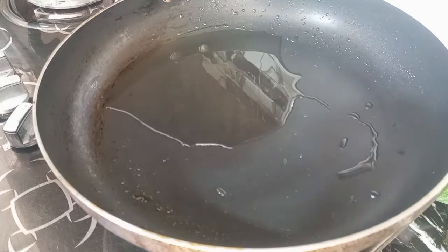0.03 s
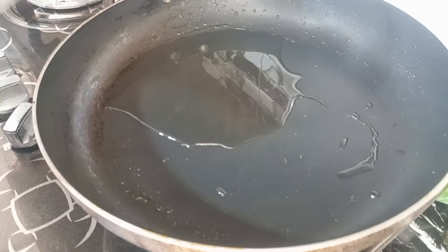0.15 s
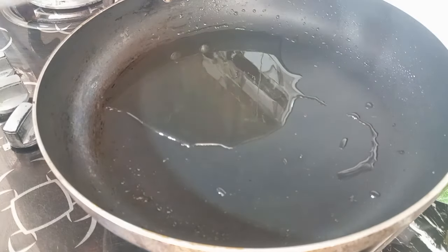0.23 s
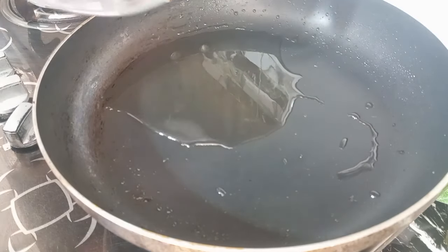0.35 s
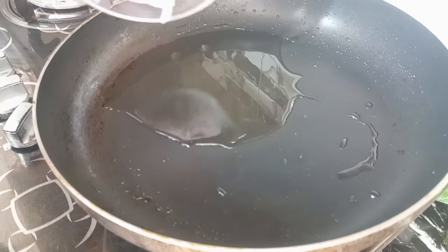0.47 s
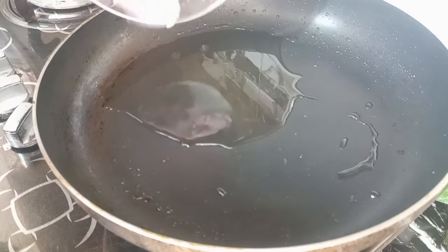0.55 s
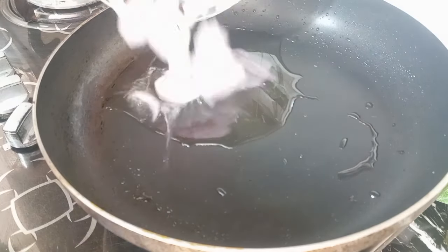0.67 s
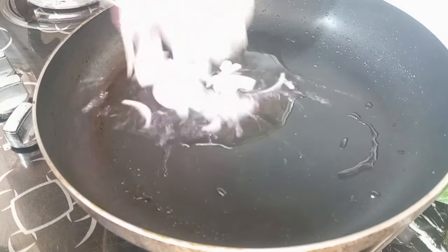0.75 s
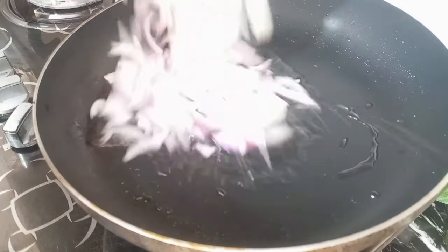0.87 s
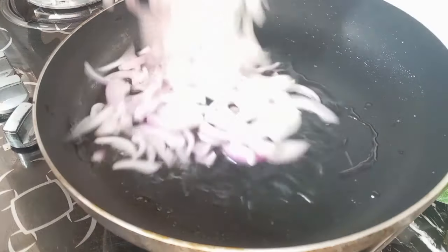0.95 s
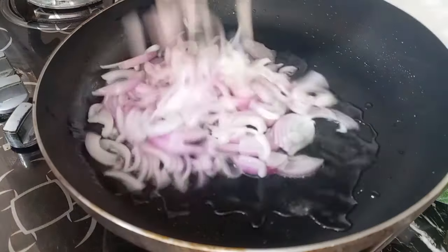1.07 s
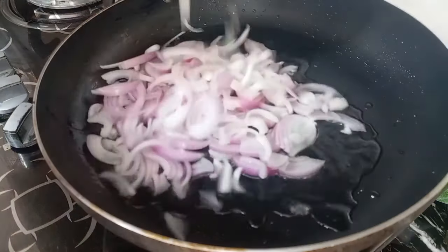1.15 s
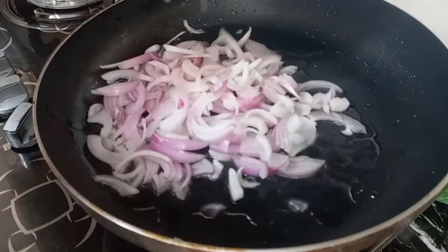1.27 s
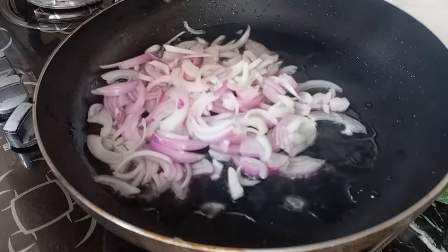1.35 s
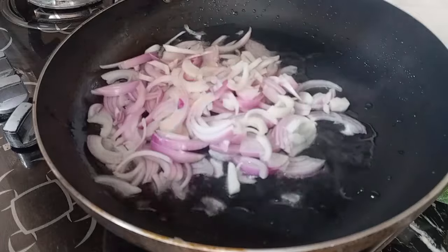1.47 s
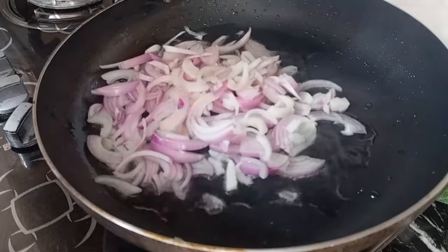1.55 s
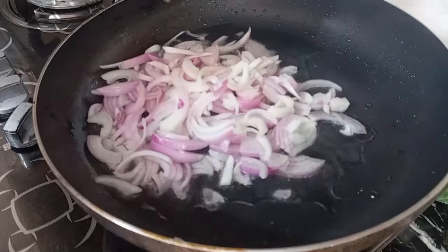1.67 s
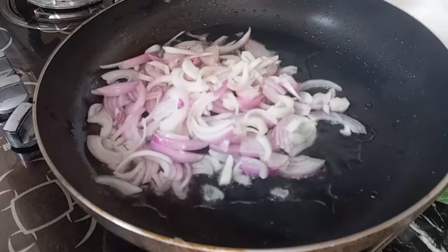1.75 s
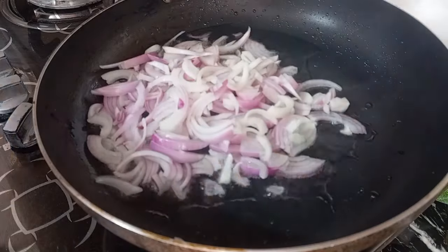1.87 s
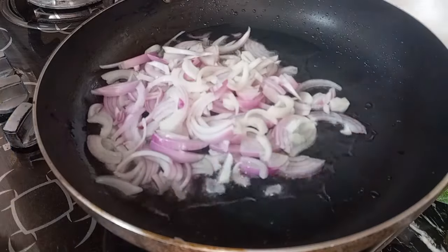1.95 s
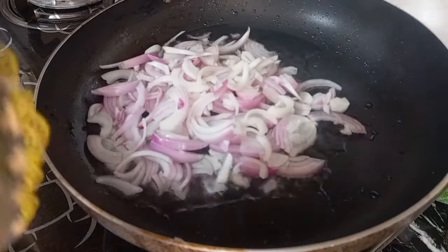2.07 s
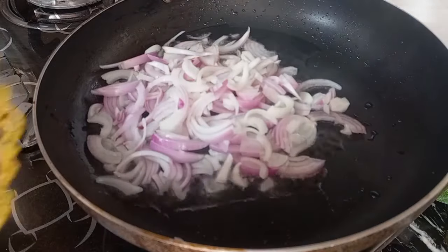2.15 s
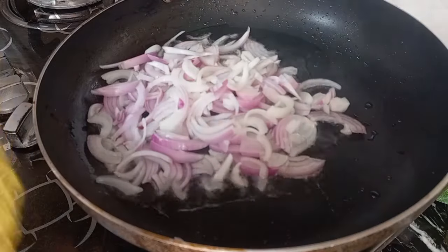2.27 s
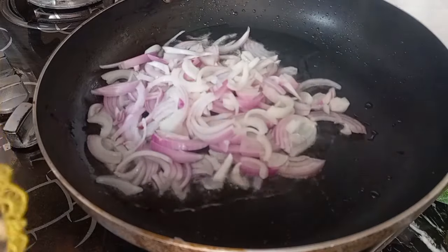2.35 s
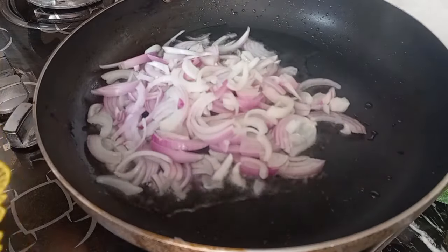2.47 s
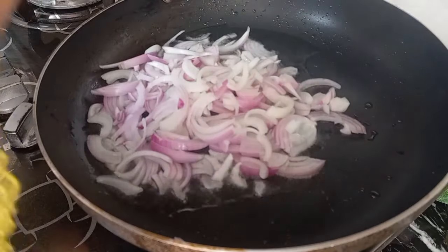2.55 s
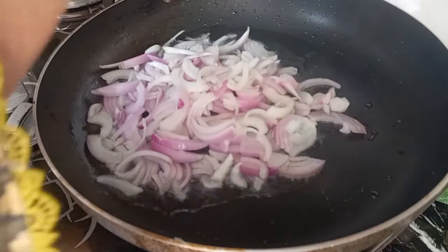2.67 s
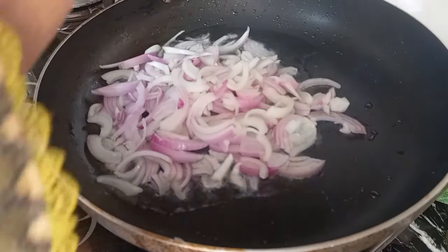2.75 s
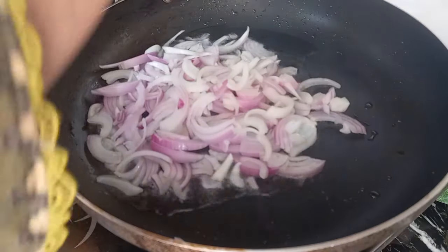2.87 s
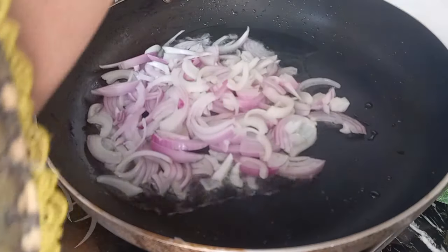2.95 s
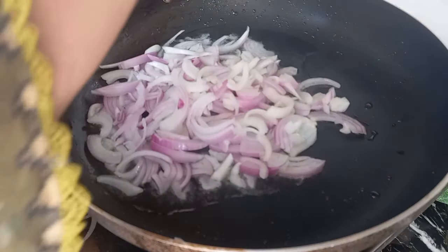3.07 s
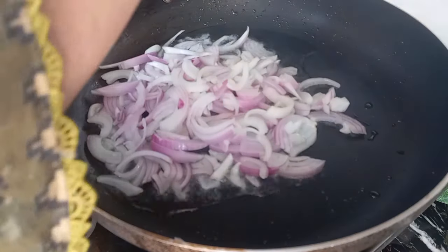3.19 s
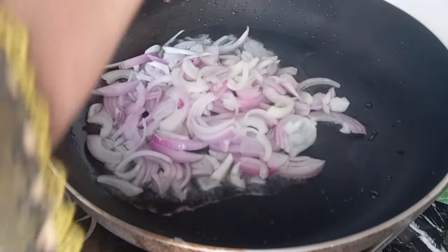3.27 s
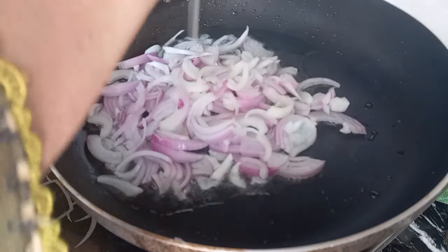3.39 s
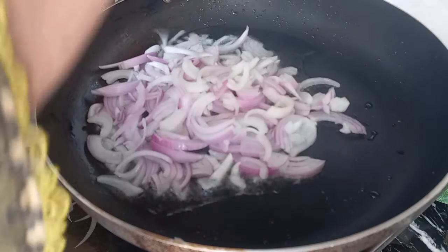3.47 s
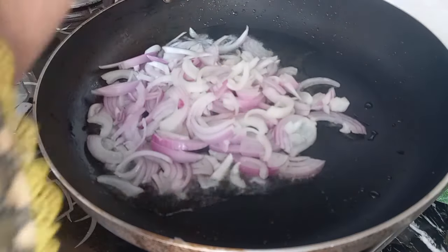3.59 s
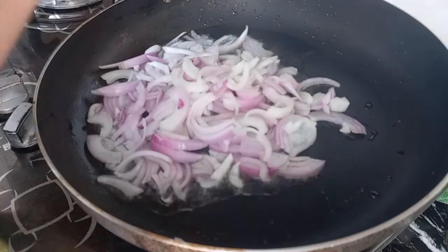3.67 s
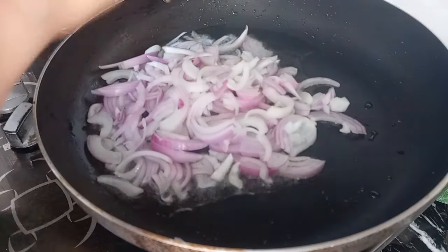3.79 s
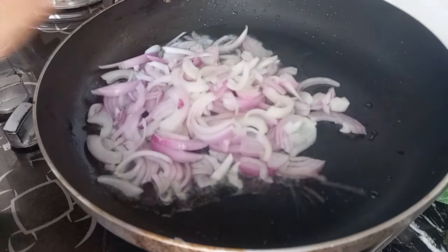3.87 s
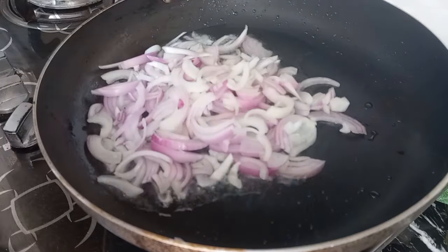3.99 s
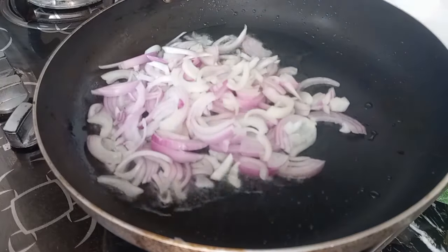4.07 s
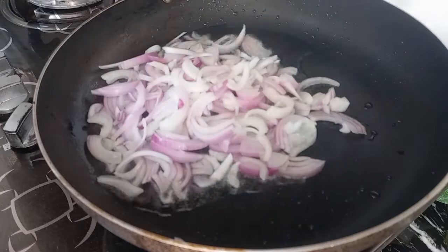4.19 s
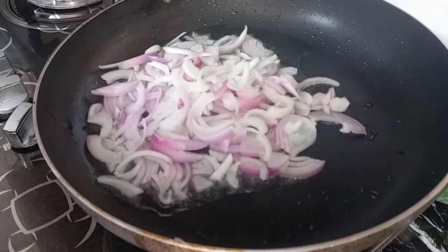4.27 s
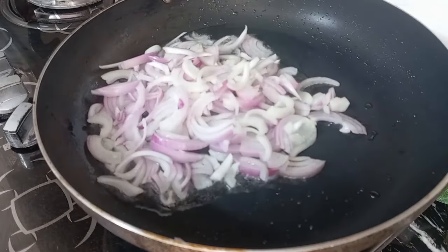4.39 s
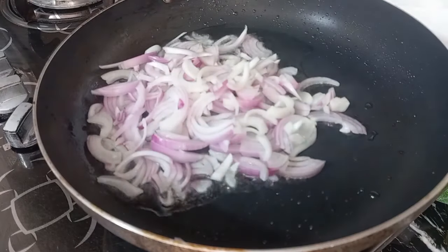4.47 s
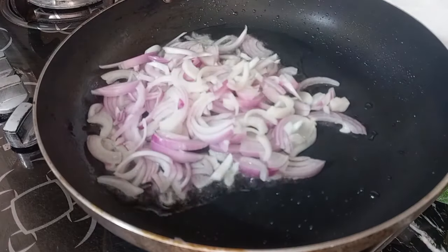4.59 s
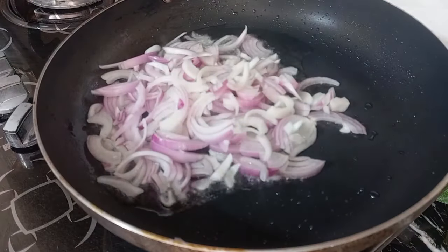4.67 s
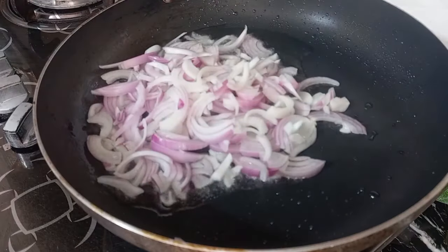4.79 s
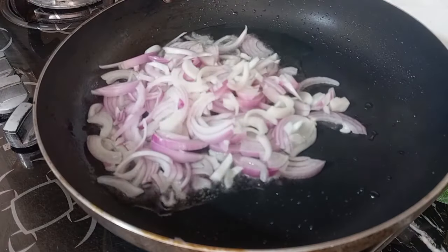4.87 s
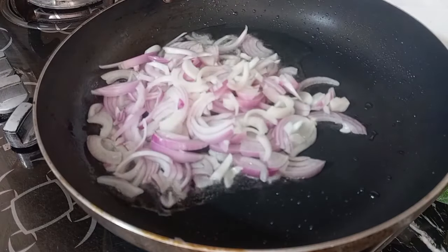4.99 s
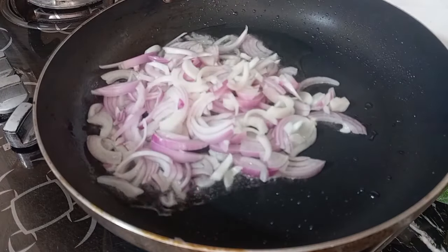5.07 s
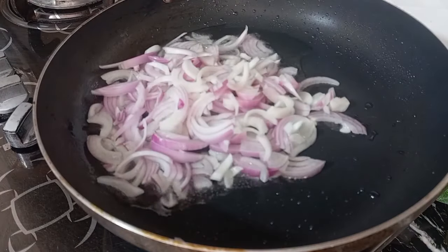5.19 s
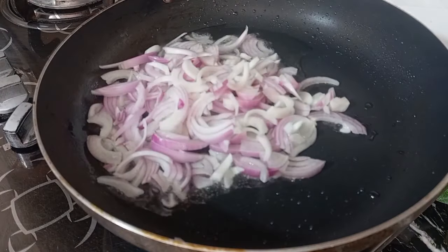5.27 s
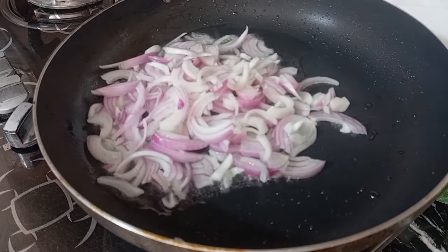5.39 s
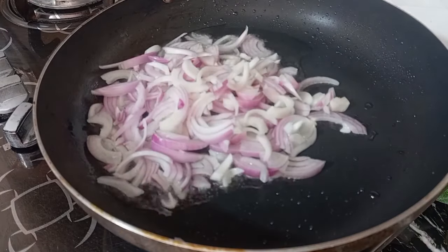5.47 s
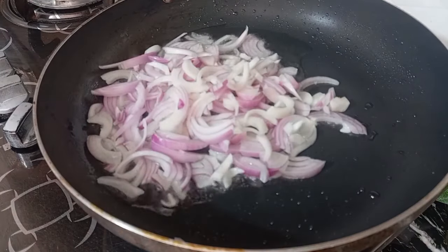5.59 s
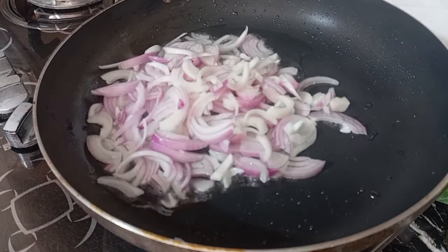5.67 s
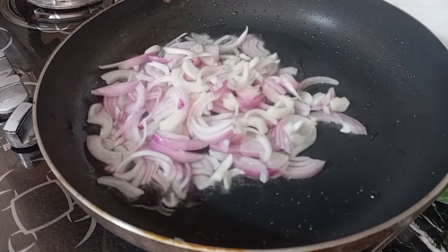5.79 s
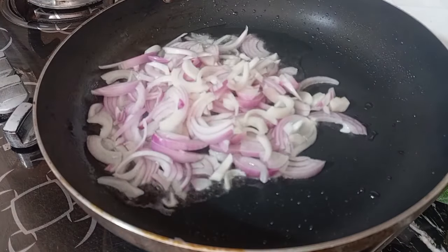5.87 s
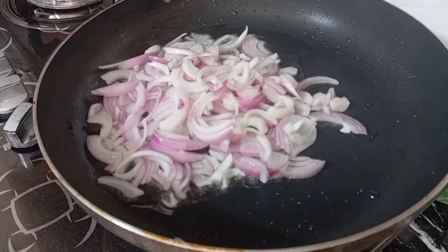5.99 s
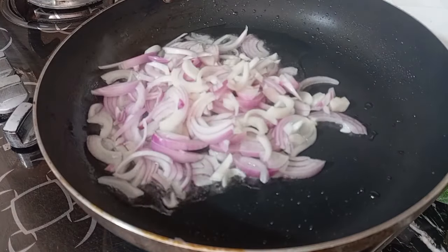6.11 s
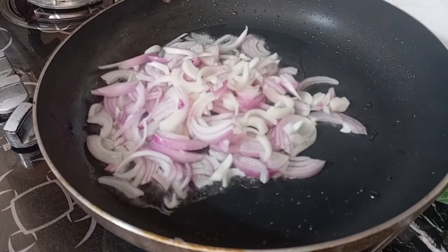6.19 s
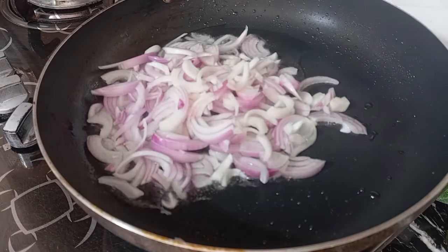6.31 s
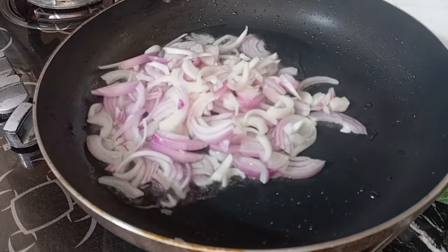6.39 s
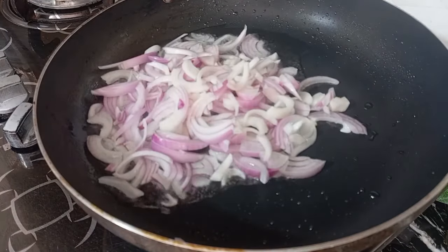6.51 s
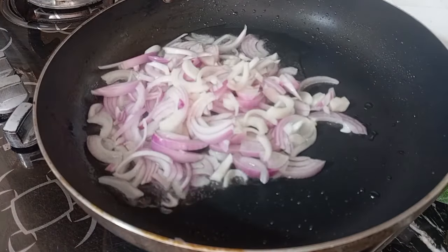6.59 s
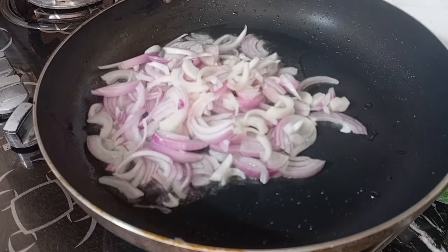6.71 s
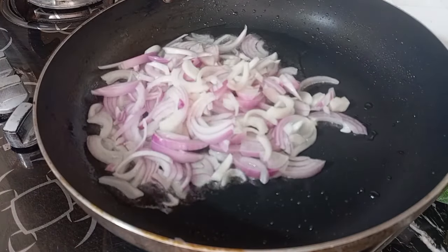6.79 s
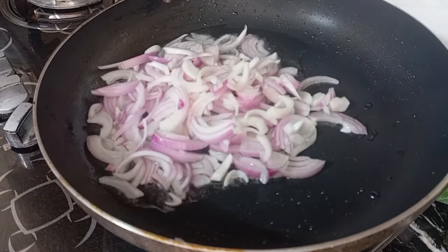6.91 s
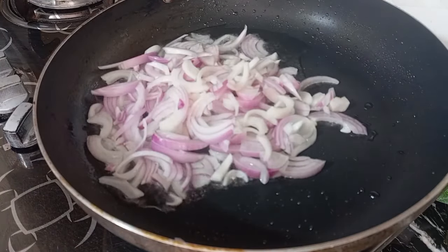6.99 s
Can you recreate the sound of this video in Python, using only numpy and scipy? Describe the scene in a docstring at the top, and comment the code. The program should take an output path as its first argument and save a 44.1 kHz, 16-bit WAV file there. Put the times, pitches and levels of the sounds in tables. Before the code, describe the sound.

A quiet small kitchen, heard close above a frying pan. Sliced onions tumble into hot oil with soft, faintly ringing thuds and a bright loud hiss with sharp spits. After about a second the roar drops quickly to a fine fizz with bubbling, pops and dull plops, slowly weakening. Near the end something hollow, probably the strainer, clatters down nearby in several quick knocks.

```python
"""Sliced onions shift on a strainer with a faint rustle (filtered clicks), over the room tone of a small kitchen.
They drop into hot oil: soft thuds ring the pan, and their surface water flashes to steam in a loud hiss of noise.
The sizzle settles to a fine fizz of tiny bursts, with bubbles, pops and plops (short rings) and sharp snaps (noise).
Near the end something hollow, probably the strainer, is put down nearby: clattering knocks that ring its body."""
import sys
import numpy as np
from scipy import signal
from scipy.fft import rfft, irfft
from scipy.io import wavfile

SR = 44100
rng = np.random.default_rng(int(sys.argv[2]) if len(sys.argv) > 2 else 0)


def unload_audio(sound):
    """Save the sound as a 16-bit wav file, at the path given as the first command line argument."""
    columns = np.transpose(np.atleast_2d(sound))
    # keep every value between -1 and 1, then stretch to whole-number steps
    steps = np.round(np.clip(columns, -1, 1) * 32767)
    wavfile.write(sys.argv[1], SR, steps.astype(np.int16))


N = 310905
TIME = np.arange(N) / SR

# the onions reach the oil at POUR_S; the sizzle grows as more of them land
POUR_S, POUR_LENGTH_S = 0.73, 0.3
# the rolling boil holds until BOIL_UNTIL_S, then sinks to a simmer
BOIL_UNTIL_S, BOIL_RELEASE_S = 1.68, 0.17
SIMMER_COOLING_DB_PER_S = 1.24  # the bubbling weakens as the oil cools


def amp(db):
    """Turns decibels into a gain."""
    return 10 ** (np.asarray(db) / 20)


def unit(x):
    """Scales to an average (rms) level of 1."""
    return x / np.sqrt(np.mean(x ** 2) + 1e-20)


def peaked(x):
    """Scales so that the highest peak is 1."""
    return x / abs(x).max()


def curve(rows):
    """Joins the rows of a table into a value at every sample."""
    return np.interp(TIME, *np.transpose(rows))


def attack(start, length):
    """Rises evenly from 0 to 1."""
    return np.clip((TIME - start) / length, 0, 1)


def release(start, time_constant):
    """Holds at 1, then dies away."""
    return np.exp(-np.maximum(TIME - start, 0) / time_constant)


def swell(centre, width):
    """A smooth rise and fall of height 1."""
    return np.exp(-((TIME - centre) / width) ** 2)


def add(mix, s, sound):
    """Mixes a sound in at time s."""
    part = mix[max(round(s * SR), 0):][:len(sound)]
    part += sound[:len(part)]


def read(points, hz):
    """Reads a table over frequency, evenly spaced by pitch."""
    f, value = np.transpose(points)
    return np.interp(np.log(hz + 1), np.log(f + 1), value)


def colour(x, points, size=4096):
    """Filters to the given spectrum without smearing ahead in time, so clicks keep their sharp fronts."""
    log_gain = np.log(amp(read(points, abs(np.fft.fftfreq(size, 1 / SR)))))
    taps = np.fft.ifft(np.exp(np.conj(signal.hilbert(log_gain)))).real
    fade_out = signal.windows.tukey(size)[size // 2:]
    return signal.oaconvolve(x, taps[:size // 2] * fade_out)[:len(x)]


def drift(per_s):
    """Random wandering of rms 1, up to about per_s swings a second."""
    hz = np.fft.rfftfreq(N // 64, 64 / SR)
    keep_slow = 1 / (1 + (hz / per_s) ** 2)
    drop_slowest = hz / (hz + 2)
    slow = irfft(rfft(rng.standard_normal(N // 64)) * keep_slow * drop_slowest)
    return unit(np.interp(TIME, np.linspace(0, TIME[-1], len(slow)), slow))


def bursts(per_s, spread_db, cap):
    """Random clicks of either sign, their sizes scattered by chance."""
    size = amp(spread_db * np.minimum(rng.exponential(1, N), cap))
    return size * rng.choice([-1, 1], N) * (rng.random(N) < per_s / SR)


def ring(hz, t60, rise, length):
    """One vibration that dies by 60 dB in t60 seconds."""
    t = TIME[:int(length * SR)]
    return np.sin(2 * np.pi * hz * t) * np.exp(-np.log(1000) * t / t60) * (1 - np.exp(-t / rise))


def struck(modes, vary_db, rise):
    """A body's vibrations, a little different at each blow; a longer rise makes a softer blow."""
    sound = 0
    for hz, db, t60 in modes:
        height = rng.choice([-1, 1]) * amp(db + vary_db * rng.standard_normal())
        sound = sound + height * ring(hz, t60, rise, length=1)
    return peaked(sound)


# how long the room's echoes last: (frequency [Hz], time to fade by 60 dB [s])
KITCHEN = [(90, 0.45), (300, 0.42), (1000, 0.46), (3000, 0.2), (8000, 0.1), (16000, 0.076)]


def kitchen(x, wet_db, size=256):
    """Adds dense wall reflections to the direct sound; the highest tones die soonest."""
    t = TIME[:min(len(x), 2 * SR // 3)]
    taps = rng.standard_normal(len(t)) * (rng.random(len(t)) < .1) * (t > .004)
    hz, age, z = signal.stft(taps, SR, nperseg=size)
    fade = np.exp(-np.log(1000) * age / read(KITCHEN, hz)[:, None])
    tail = signal.istft(z * fade, SR, nperseg=size)[1]
    return x + amp(wet_db) * signal.fftconvolve(x, tail / np.linalg.norm(tail))[:len(x)]


# tone colour of the loud early hiss, with more of the highest treble; it gives way to the settled fizz
# after DRY_S: (frequency [Hz], level per Hz [dB])
EARLY_COLOUR = [(300, -34), (430, -58), (560, -27), (950, -17), (1700, -15.5), (3000, -8), (5000, -6),
                (6400, 3), (7800, -8), (9300, -11.5), (11000, -9.5), (13300, -18), (14300, -11),
                (15200, -7)]
# tone colour of the settled fizz: (frequency [Hz], level per Hz [dB])
FIZZ_COLOUR = [(300, -47), (440, -33.5), (540, -14.5), (1000, -15.5), (2400, -10), (3500, -6.5),
               (5500, -2.5), (6800, 4), (7900, 0.5), (9300, -0.5), (10300, -5), (11000, -13), (13500, -19),
               (14200, -13), (14900, -8.5), (16000, -7.5)]
# surface water flashes off until DRY_S; then the extra loudness and the early tone colour fade
DRY_S, FLASH_RELEASE_S, EARLY_RELEASE_S = 1.492, 0.023, 0.036
FLASH_DB, EARLY_SHARE = 7, 0.36  # lift of the fizz during the flash, share of the early colour (0-1)
FIZZ_DB, FIZZ_COOLING_DB_PER_S = -36.5, 0.92  # level before the lift; it falls as the oil cools


def fizz():
    """Thousands of tiny steam bursts a second over a hiss; loud at first, then a settled fizz."""
    early = np.clip(EARLY_SHARE * release(DRY_S, EARLY_RELEASE_S), 0, 1)
    # one burst sets off its neighbours: flurries start at once and die in a few milliseconds
    triggers = bursts(per_s=260, spread_db=3.5, cap=4.2) ** 2
    flurry = signal.oaconvolve(triggers, np.exp(-TIME[:2048] / 0.0012))[:N]
    near = unit(unit(bursts(per_s=14000, spread_db=2.5, cap=3.9)) * np.sqrt(abs(flurry)))
    hiss = rng.standard_normal(N) * amp(2.5 + 1.3 * early)
    sound = unit(near + hiss) * amp(0.21 * drift(per_s=61))
    early_part = np.sqrt(early) * unit(colour(sound, EARLY_COLOUR))
    settled_part = np.sqrt(1 - early) * unit(colour(sound, FIZZ_COLOUR))
    level_db = FIZZ_DB - FIZZ_COOLING_DB_PER_S * (TIME - POUR_S)
    level_db = level_db + FLASH_DB * release(DRY_S, FLASH_RELEASE_S) + 0.7 * drift(per_s=13)
    return (early_part + settled_part) * amp(level_db) * attack(POUR_S, POUR_LENGTH_S)


# tone colour of the bubbling: (frequency [Hz], level per Hz [dB])
BOIL_COLOUR = [(400, -46), (540, -11), (950, -17), (1100, -4.5), (1350, -10), (1700, 0), (2400, -3.5),
               (2780, 1), (2950, 7.5), (3150, 0.5), (3800, 3.5), (6300, 4), (7500, -2), (10000, -30)]
# the simmer wells up now and then: (time [s], lift [dB])
SURGES = [(2.4, 1.5), (3.62, 4.5), (4.33, 2.5), (5.35, 2.5), (5.8, 2), (7.03, 4.5)]
SURGE_WIDTH_S = 0.18
BOIL_ATTACK_S, SIMMER_DB, ROLLING_DB = 0.75, -42.5, 12  # build-up, simmer level, lift of the rolling boil
ROLLING_SHARE = 0.49  # share of the boil in which bubbles come too thickly to be told apart (0-1)


def boil(count=36):
    """Bubbles of many sizes ring briefly as they burst; they merge in the rolling boil and part in the simmer."""
    sound, rolling = np.zeros(N), release(BOIL_UNTIL_S, BOIL_RELEASE_S)
    merged = np.clip(ROLLING_SHARE * rolling ** .5, 0, 1)
    thick, sparse = np.sqrt(merged), np.sqrt(1 - merged)
    for hz in np.geomspace(560, 7500, count) * rng.uniform(0.99, 1.03, count):
        bubble = ring(hz, t60=26 / hz, rise=0.00082, length=.06)
        # small, high-pitched bubbles are more frequent
        train = bursts(per_s=80 * np.sqrt(hz / 3000), spread_db=6.0, cap=4.4)
        train = sparse * unit(train) + thick * rng.standard_normal(N)
        sound += np.sqrt(hz) * unit(signal.oaconvolve(train, bubble)[:N])
    level_db = SIMMER_DB - SIMMER_COOLING_DB_PER_S * (TIME - POUR_S) + ROLLING_DB * rolling
    level_db = level_db + sum(db * swell(s, SURGE_WIDTH_S) for s, db in SURGES)
    bubbling = unit(colour(kitchen(sound, wet_db=-2), BOIL_COLOUR))
    return bubbling * amp(level_db) * attack(LANDINGS[0][0], BOIL_ATTACK_S) ** .5


# the emptied strainer hangs over the pan and throws the sizzle back: (time [s], echo strength [0-1])
OVERHEAD = [(1.5, 0.03), (1.66, 0.12), (1.85, 0.2), (2.0, 0)]
OVERHEAD_HZ = 350.5  # one over the round trip up to the strainer and back


def under_strainer(x):
    """Sound bounces twice between pan and strainer; the short echoes make it ring hollow."""
    strength = np.clip(curve(OVERHEAD), 0, .9)
    once, twice = (np.interp(TIME - k / OVERHEAD_HZ, TIME, x) for k in (1, 2))
    return (x + strength * once + strength ** 2 * twice) / np.sqrt(1 + strength ** 2 + strength ** 4)


# lesser bubbles: level before cooling and pitch shift it, its scatter, and the range of pitch
LESSER_POP_DB, LESSER_POP_SPREAD_DB, LESSER_POP_LOW_HZ, LESSER_POP_HIGH_HZ = -37, 3.5, 1500, 5450


def lesser_pops(count=26):
    """Chance times, levels and pitches of lesser bubbles in the simmer, weaker as the oil cools."""
    when, size, pitch = rng.random((count, 3)).T
    start = BOIL_UNTIL_S + BOIL_RELEASE_S
    s = start + (TIME[-1] - start) * (np.arange(count) + when) / count
    db = LESSER_POP_DB + LESSER_POP_SPREAD_DB * (2 * size - 1) - SIMMER_COOLING_DB_PER_S * (s - s.mean())
    db = db + 7 * (pitch - .5)  # the high ones burst in the open, the low ones under the slices
    hz = LESSER_POP_LOW_HZ * (LESSER_POP_HIGH_HZ / LESSER_POP_LOW_HZ) ** pitch
    return list(zip(s, db, hz))


# the largest steam bubbles: (time [s], level before a small lift [dB], pitch [Hz])
POPS = [(1.502, -18.5, 6000), (1.583, -21.5, 2940), (1.584, -21.5, 4790), (1.615, -33, 3700),
        (1.655, -31, 1700), (1.806, -29, 5070), (2.156, -31, 4500), (2.177, -37.5, 1620),
        (2.207, -24, 5700), (2.452, -26.5, 3600), (2.5438, -22.5, 2950), (2.599, -26, 3720),
        (2.602, -36, 1676), (2.935, -30, 3920), (2.968, -33, 2930), (3.053, -27, 5230), (3.68, -31.5, 4530),
        (3.878, -22.5, 2776), (4.05, -27, 5330), (4.427, -33, 3600), (4.612, -33, 3520),
        (4.6926, -27.5, 4620), (5.3, -35.5, 3460), (5.782, -26.5, 2935), (5.806, -28, 5200),
        (5.9607, -28.5, 2975), (6.03, -31.5, 3730), (6.525, -31, 4700), (6.7023, -30.5, 4800),
        (7.005, -25.5, 5870)]
POP_CYCLES = 120  # a bubble dies by 60 dB in this many cycles, so small ones ring shorter


def pops():
    """Large bubbles tear open with a short spray, then splutter on at their own pitch."""
    sound, t = np.zeros(N), TIME[:SR // 4]
    for s, db, hz in POPS + lesser_pops():
        bubble = ring(hz, POP_CYCLES / hz, rise=.0004, length=.25)
        long_noise = rng.standard_normal(len(t)) * np.exp(-t / 0.035)
        splutter = signal.fftconvolve(long_noise, ring(hz, t60=26 / hz, rise=0.00036, length=.04))[:len(t)]
        short_noise = rng.standard_normal(len(t)) * np.exp(-t / 0.006)
        tear = np.gradient(ring(hz, t60=5 / hz, rise=.0001, length=.02))
        spray = signal.fftconvolve(short_noise, tear)[:len(t)]
        pop = peaked(bubble) + .4 * peaked(splutter) + .5 * peaked(spray)
        add(sound, s, amp(db + 1.5) * kitchen(peaked(pop), wet_db=-10))
    return sound


# sharp spits of oil: (time [s], peak level [dB], centre frequency [Hz])
SNAPS = [(0.748, -39, 6640), (0.815, -20, 5000), (0.942, -16.5, 8300), (1.114, -14, 5900),
         (1.215, -14, 4520), (1.728, -15, 3830), (3.0743, -16.5, 5300), (3.9305, -16, 6400),
         (3.355, -30, 4560), (5.387, -22.5, 7026), (5.5453, -20, 6740), (5.768, -22.5, 5860),
         (5.828, -24, 8150)]
# tone colour of a spit: (frequency [Hz], level [dB])
SPIT_COLOUR = [(100, -40), (400, -33), (700, 6), (3000, 4.5), (9000, 4), (12000, 8), (16000, -3)]


def snaps():
    """Droplets explode in the oil with a very short crack and a splatter of noise."""
    sound, t = np.zeros(N), TIME[:2048]
    for s, db, hz in SNAPS:
        # a single click (t == 0) starts the splatter
        splatter = 0.14 * rng.standard_normal(len(t)) * np.exp(-t / 0.0022) + (t == 0)
        crack = signal.fftconvolve(splatter, ring(hz, t60=0.0015, rise=.00005, length=.02))
        add(sound, s, amp(db) * peaked(colour(crack, SPIT_COLOUR)))
    return sound


# dull plops from under the heap: (time [s], peak level before echoes [dB], centre frequency [Hz])
PLOPS = [(2.144, -32.5, 724), (2.16, -48, 354), (2.176, -38, 550), (2.587, -42, 1000), (3.879, -32, 1711),
         (3.932, -43, 740), (3.98, -46, 693), (4.208, -31.5, 1550), (4.978, -35, 2270), (5.103, -37, 1500)]


def plops():
    """Steam trapped under the slices escapes with a low gurgle that dies at once."""
    sound, t = np.zeros(N), TIME[:SR // 3]
    for s, db, hz in PLOPS:
        gurgle = rng.standard_normal(len(t)) * np.exp(-t / 0.011)
        cavity = np.gradient(ring(hz, t60=7 / hz, rise=0.0001, length=.05))
        add(sound, s, amp(db) * peaked(signal.fftconvolve(gurgle, cavity)))
    return kitchen(sound, wet_db=-9.0)


# clumps of onion landing: (time [s], level of the pan's ring [dB])
LANDINGS = [(0.763, -32.5), (0.788, -32.5), (0.808, -28), (0.887, -29.5), (0.924, -33), (0.998, -31.5),
            (1.03, -31.5), (1.091, -34.5), (1.14, -34), (1.2, -41.5), (1.25, -42.5)]
# ringing tones of the oiled pan: (frequency [Hz], relative level [dB], time to fade by 60 dB [s])
PAN = [(551.4, -6.5, 0.29), (580, -11.5, 0.17), (636, -7.5, 0.095), (917, -12, 0.082), (1104, -18, 0.16),
       (1566, -21.5, 0.17), (1880, -21, 0.15)]
# tone colour of a dull thud or thump, also used by the knocks: (frequency [Hz], level per Hz [dB])
THUMP = [(30, -14), (60, -17), (95, -2), (115, -10), (135, -5), (170, 1), (210, -5.5), (260, -3), (400, -7),
         (800, -29), (2000, -76)]
# the bulk of the heap lands mid-pour with the heaviest thuds; THUD_DB is relative to the ring
BULK_S, BULK_WIDTH_S, THUD_DB = 0.895, 0.1, -9.5


def landings():
    """Soft clumps tumble into the pan with a thud and set its bottom ringing."""
    sound, t = np.zeros(N), TIME[:SR]
    for s, db in LANDINGS:
        weight = amp(THUD_DB) / (1 + ((s - BULK_S) / BULK_WIDTH_S * 2) ** 2)
        thud = peaked(colour(rng.standard_normal(SR) * t * np.exp(-t / 0.027), THUMP))
        add(sound, s, amp(db) * (struck(PAN, vary_db=2.0, rise=0.0021) + weight * thud))
    return sound


# the strainer meets the counter and rattles: (time [s], crack level [dB], ring level [dB],
# low thump level [dB], frequency around which the blow rings the body most [Hz])
KNOCKS = [(6.058, -12, -14, -16.5, 660), (6.101, -15, -15.5, -27, 880), (6.136, -18, -33, -22.5, 850),
          (6.197, -21.5, -23.5, -36, 1200), (6.2527, -14, -13.5, -27.5, 1340), (6.305, -18, -22, -39, 3400),
          (6.385, -32, -30, -42, 1120)]
# ringing tones of strainer and counter: (frequency [Hz], relative level [dB], time to fade by 60 dB [s])
STRAINER = [(96.2, 1, 0.98), (112.6, 5, 0.82), (163, -1, 0.35), (267, 2.5, 0.34), (314, -2, 0.26),
            (501, -5, 0.47), (616, -3.5, 0.5), (719, -0.5, 0.39), (790, -9, 0.18), (900, 5.5, 0.27),
            (968, -2, 0.5), (1062, -8.5, 1), (1112, -8.5, 0.96), (1223, -5, 0.53), (1384, -5.5, 0.4),
            (1453, -8, 0.54), (1460, -7, 0.35), (1590, -7.5, 0.25), (1816, -7, 0.48), (2130, -13, 0.33),
            (2310, -12, .3), (2900, -14, 0.38), (3176, -8, 0.28), (3260, -12, 0.27)]
# tone colour of the crack: (frequency [Hz], level per Hz [dB])
CRACK = [(100, -41), (300, -4.5), (600, -2), (950, 6), (1400, -1.5), (2000, -4.5), (2900, -10),
         (3500, -16.5), (4300, -57), (8000, -56)]
# thin ring of the steel rim, in close tones that beat: (frequency [Hz], level [dB], time to fade by 60 dB [s])
RIM = [(4930, -46, 2.5), (4914, -47, 2.5), (4972, -56, 2), (7881, -53, 2.5), (7899, -53, 2.5)]
RIM_START_S, RIM_STOP_S = 6.06, 6.255  # the rim is heard from the first blow until it falls silent
TAIL_FADE_S = 6.49  # from here the tail of the knocks fades quickly


def knocks(falloff_db=5):
    """Each blow is a short chatter, a ring of the hollow body and a thump in the counter."""
    sound, t = np.zeros(N), TIME[:SR]
    for s, crack_db, ring_db, thump_db, centre_hz in KNOCKS:
        chatter = rng.standard_normal(SR) * (np.exp(-t / .009) + .4 * np.exp(-t / .05))
        push = np.exp(-t / 0.00072) + 0.078 * rng.standard_normal(SR) * np.exp(-t / 0.018)
        thump = peaked(colour(push, THUMP))
        # tones lose falloff_db for every octave away from the centre of the blow
        modes = [(hz, db - falloff_db * abs(np.log2(hz / centre_hz)), t60) for hz, db, t60 in STRAINER]
        add(sound, s, amp(crack_db) * kitchen(peaked(colour(chatter, CRACK)), wet_db=-4))
        add(sound, s, amp(ring_db) * struck(modes, vary_db=2, rise=0.00044))
        add(sound, s, amp(thump_db) * kitchen(thump, wet_db=-3))
    rim = sum(amp(db) * ring(hz, t60, 0.0028, RIM_STOP_S - RIM_START_S) for hz, db, t60 in RIM)
    add(sound, RIM_START_S, rim * signal.windows.tukey(len(rim), .1))
    # the tail fades by 130 dB per second
    return sound * amp(-130 * np.maximum(TIME - TAIL_FADE_S, 0))


# tone colour of the wet slices on the strainer: (frequency [Hz], level per Hz [dB])
SLIDE_COLOUR = [(100, -13), (300, 1), (700, -11), (1050, 3), (1400, -11), (1800, 4), (2050, -7), (2300, 4),
                (2650, -6), (3100, -0.5), (4400, -6), (5200, -13), (6000, -14), (7500, -19), (11000, -42)]
# the slices shift once as the strainer tips, and rustle faintly until the bulk falls
SLIDE_S, SLIDE_WIDTH_S, SLIDE_DB, RUSTLE_DB = 0.29, 0.079, -71, -84


def slide():
    """Wet slices rub over the strainer in many tiny clicks."""
    sliding = amp(SLIDE_DB) * swell(SLIDE_S, SLIDE_WIDTH_S) + amp(RUSTLE_DB) * (TIME < BULK_S)
    return unit(colour(bursts(per_s=4500, spread_db=-3.0, cap=4), SLIDE_COLOUR)) * sliding


# tone colour of the low rumble: (frequency [Hz], level per Hz [dB])
RUMBLE = [(20, -28), (50, -1.5), (85, -1), (160, 3), (230, -23), (400, -19.5), (800, -34)]
# swells of the rumble: (time [s], level [dB], width [s])
RUMBLE_SWELLS = [(0.3, -62, 0.028), (1.05, -60, 0.2), (1.68, -72, 0.083), (1.96, -61, 0.039)]
RUMBLE_DB = -71  # between the swells, while the pan cooks


def rumble():
    """Low noise of uneven strength while the pan cooks, with a few swells."""
    strength = amp(RUMBLE_DB) * attack(POUR_S, POUR_LENGTH_S)
    strength = strength + sum(amp(db) * swell(s, width) for s, db, width in RUMBLE_SWELLS)
    return unit(colour(rng.standard_normal(N), RUMBLE) * amp(2.6 * drift(per_s=16))) * strength


# tone colour of the quiet kitchen: (frequency [Hz], level per Hz [dB])
FLOOR = [(20, -24), (60, 4), (100, -3.5), (170, 2.5), (280, -1.5), (400, -6), (620, -6), (1200, -14),
         (3000, -32.5), (5400, -27), (6100, -20.5), (7000, -29), (15000, -50)]


def room_tone():
    """Steady, faint noise of the kitchen."""
    return amp(-71.0) * unit(colour(rng.standard_normal(N), FLOOR))


LULL_S, LULL_WIDTH_S, LULL_DB = 1.297, 0.012, -4.5  # the sizzle dips briefly as the pour ends


def scene():
    """Everything at one microphone above the pan."""
    sizzle = under_strainer(fizz() + boil()) * amp(LULL_DB * swell(LULL_S, LULL_WIDTH_S))
    cooking = sizzle + pops() + snaps() + plops()
    background = slide() + rumble() + room_tone()
    return (cooking + landings() + knocks() + background)[None]


EDGE_HZ = 15850  # the highest treble is cut off here


def record(dry):
    """The small microphone drops the deep bass; then the highest treble is cut off."""
    thin = signal.sosfilt(signal.butter(3, 62, "highpass", fs=SR, output="sos"), dry)
    treble_cut = signal.firwin(701, EDGE_HZ, window=("kaiser", 9), fs=SR)
    return signal.oaconvolve(thin, treble_cut[None], "same")


dry = scene()
out = record(dry)
unload_audio(out)
```